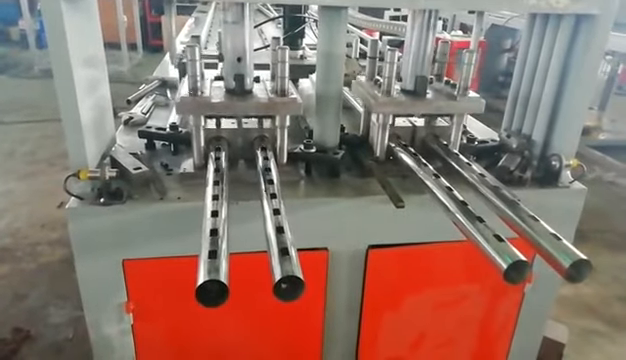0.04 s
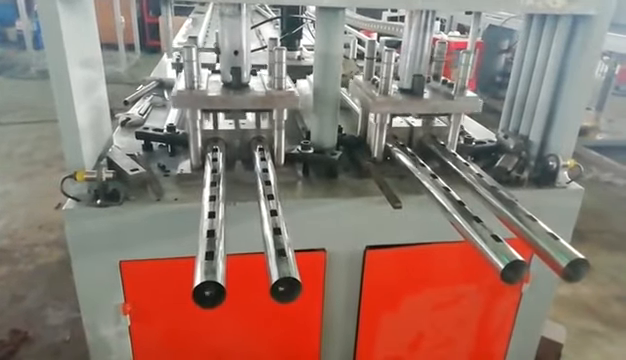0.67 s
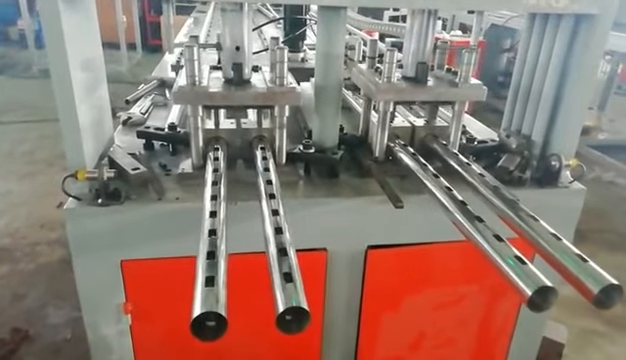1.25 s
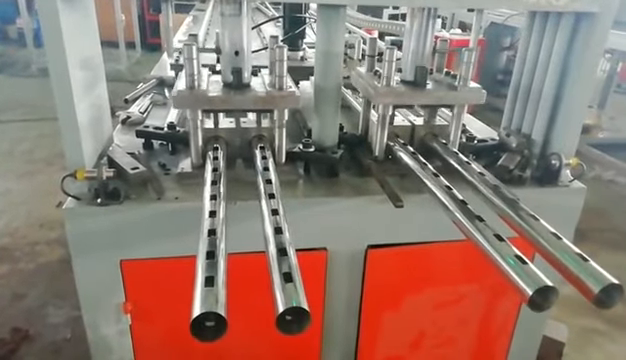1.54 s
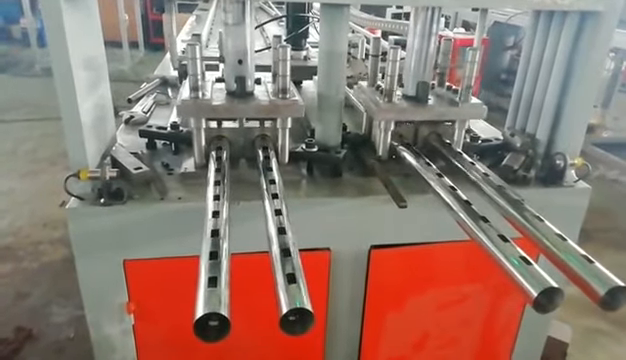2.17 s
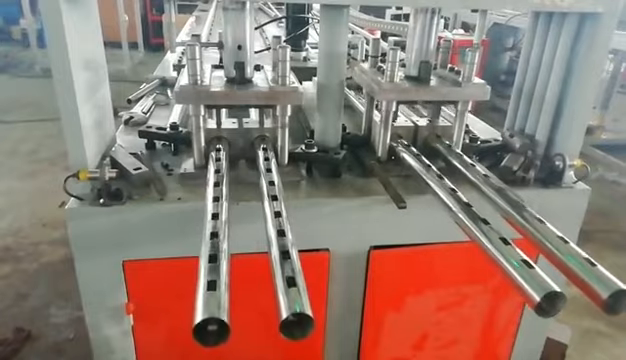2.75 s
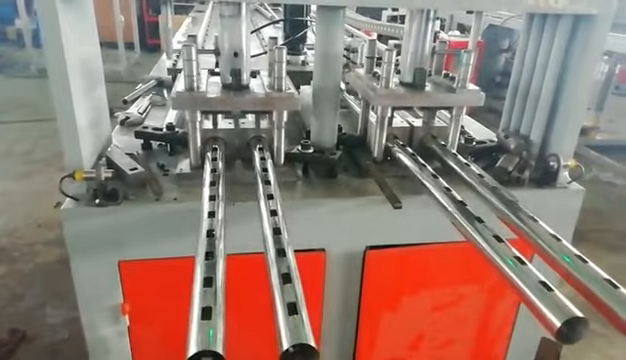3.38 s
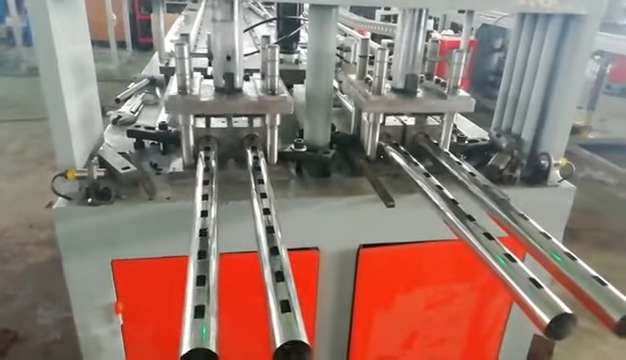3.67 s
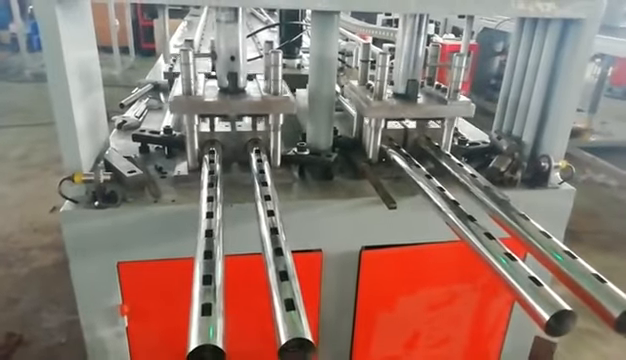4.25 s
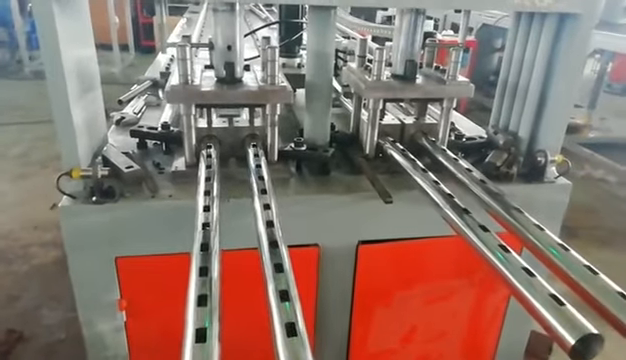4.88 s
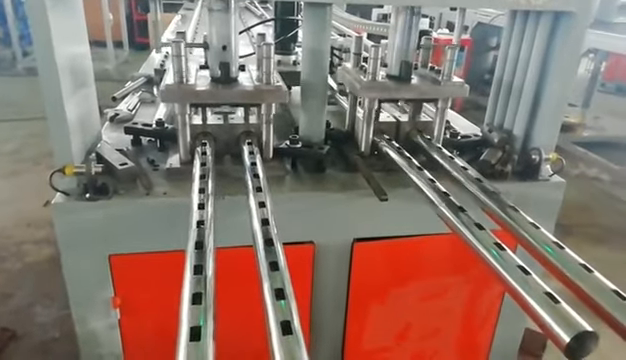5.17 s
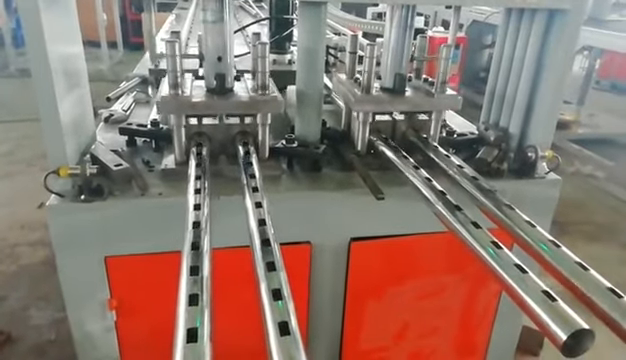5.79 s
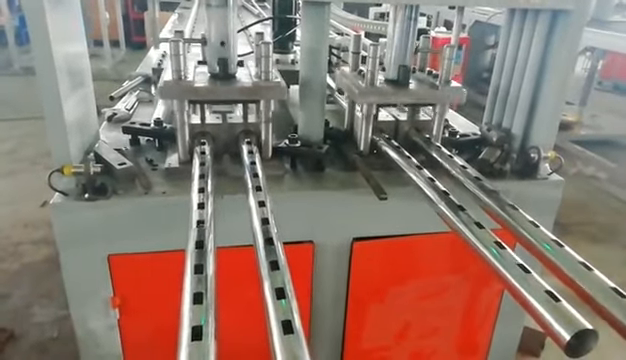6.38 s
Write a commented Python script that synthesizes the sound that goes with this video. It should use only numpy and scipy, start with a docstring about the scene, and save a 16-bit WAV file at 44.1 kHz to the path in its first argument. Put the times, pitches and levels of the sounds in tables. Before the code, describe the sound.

Four sharp metallic punch hits alternate with dull hydraulic knocks, humming and sliding, squealing tubes over steady workshop noise.

```python
"""A hydraulic punch snaps through steel tube about every two seconds; its die cracks, rebounds and rings.
Between hits friction makes the tubes slide, sing and squeal, and steel rattles faintly on the die.
On each stroke a valve knocks and the pump hums under load, over a bed of air hiss and workshop din.
Loud hits duck the whole mix through a gain control, and the shop noise swells back after them."""
import sys
import numpy as np
from scipy import signal
from scipy.fft import rfft, irfft
from scipy.io import wavfile
from scipy.ndimage import uniform_filter1d, minimum_filter1d

SR = 44100
rng = np.random.default_rng(int(sys.argv[2]) if len(sys.argv) > 2 else 0)


def wav_record(signal):
    """Record a signal, one row per channel, as 16-bit PCM in the file named by sys.argv[1]."""
    frames = np.transpose(np.atleast_2d(signal))
    bounded = np.clip(frames, -1, 1)
    # unit amplitude maps onto the largest positive 16-bit level
    quanta = np.round(bounded * 32767).astype(np.int16)
    wavfile.write(sys.argv[1], SR, quanta)


N = 292383
TIME = np.arange(N) / SR
FREQS = np.maximum(np.fft.rfftfreq(N, 1 / SR), 1)
RIGHT_LAG_S = 0.000607
CHANNEL_LAG_S = np.array([[0], [RIGHT_LAG_S]])

# Table levels are faders within a layer, ahead of its trim.
# the punch breaks through: t/s, snap/dB, length/s, wall ring/dB, squeak/dB
PUNCHES = [(0.014, -1, 0.0043, -5, -51), (1.809, 0, 0.0043, -21, 3), (3.638, 0.5, .006, -2, -38),
           (5.5564, 2.5, 0.0039, -4.5, -15)]
# the die lets go and rebounds: t/s, length/s, die/dB, plate/dB, die pitch ratio, crack/dB
DIE_BLOWS = [(0.032, 0.006, -2.5, -1.5, 1.04, -10), (0.047, 0.0071, -10.5, -10.5, 1.1, -19),
             (1.822, 0.013, -18, -14.5, 0.87, -30), (1.854, 0.0051, -4.5, -3, 0.97, -13),
             (1.869, 0.0013, -6.5, -1, 1.2, 1.5), (1.875, 0.0028, -7, -14, 1.0, -12),
             (3.663, 0.012, -15, -22.5, 1.1, -25), (3.686, 0.0045, -7.5, -1.5, .95, -6),
             (3.699, 0.01, -7, -4, .94, -19), (5.567, 0.006, -14.5, -10.5, .82, -19),
             (5.581, 0.0085, -7, -19, .8, -24), (5.606, 0.0061, -6.5, -3, 0.87, -5),
             (5.621, 0.004, -6, -6, .97, -11), (5.631, 0.0023, -5, -6, .93, -3.5)]
# the first punch's opening hit, then faint stray rattles: t/s, level/dB, length/s, plate send/dB
CLATTERS = [(.002, -2, 0.0029, 3.5), (1.279, -20.5, 0.011, -18), (2.383, -20, 0.025, -25),
            (4.055, -22, 0.016, -8), (4.649, -19, 0.014, -11), (5.071, -24, 0.0039, -11)]
# resonances of the steel impacts: f/Hz, width/Hz, level/dB
SNAP_MODES = [(5550, 140, -0.5), (6040, 410, 1.5), (6450, 150, -19), (4670, 310, -24)]
WALL_MODES = [(1134, 44, -0.5), (1340, 26, -6.5), (1550, 45, -4), (2220, 150, -2), (2600, 190, -1),
              (4700, 170, 0)]
DIE_MODES = [(1130, 67, -2), (1407, 40, 7), (1667, 110, 1), (1824, 100, 5), (2380, 130, 1), (2860, 650, -6),
             (3340, 120, -1.5), (3950, 150, -3.5), (5040, 310, 0)]
PLATE_MODES = [(5020, 230, -6.5), (5646, 200, 7.5), (5834, 120, 5), (5995, 200, 8.5), (6500, 250, -14.5)]
TAIL_MODES = [(6120, 47, -3.5), (5980, 73, -18), (3940, 170, -14), (2380, 340, -15)]

# dry steel squeals on steel: t/s, length/s, level/dB, fade/(dB/s), pitch ratio
SQUEALS = [(1.622, .062, -19, 170, 1.014), (1.72, .008, -25, 260, 1.017), (1.765, .03, -22.5, 260, 1.016),
           (2.018, .03, -24, 200, 1.018), (2.09, .025, -22, 150, 1.014), (2.648, .022, -16.5, 320, .991),
           (2.712, .03, -20.5, 110, .995), (2.812, .055, -20.5, 130, 1.004), (2.93, .03, -29, 42, .999)]
# hard rubs, and one long drag: start/s, end/s, level/dB
HARD_RUBS = [(1.535, 1.686, -20.5), (2.554, 2.852, -23)]
LONG_SCRAPE = (3.75, 4.4, -24)
# tubes sliding in their guides: t/s, level/dB
SLIDE_LEVEL = [(.07, -16), (.28, -19), (.37, -23), (.73, -18.5), (1.24, -27.5), (1.57, -22), (1.69, -24.5),
               (2.12, -23), (2.48, -38.5), (2.72, -58), (3.08, -36), (3.38, -17.5), (3.93, -21.5),
               (4.47, -19.5), (5.1, -45), (5.69, -29.5), (6.63, -34.5)]
# a rubbed tube sings, a tube grazes its guide, the feed whirrs: t/s, length/s, level/dB
SONGS = [(1.051, 0.051, -21.5), (3.918, 0.05, -22), (6.498, .16, -21)]
RASPS = [(0.215, .07, -26.5), (0.447, .04, -28), (4.63, .03, -27)]
FEEDS = [(1.66, 0.05, -25), (3.5, 0.12, -26.5), (5.356, 0.072, -28.5)]
# resonances driven by friction: f/Hz, width/Hz, level/dB
SQUEAL_MODES = [(3790, 20, 4.5), (3850, 43, 2.5), (4050, 45, 0.5), (4060, 35, -12.5)]
HARD_RUB_MODES = [(3965, 42, 9.5), (4250, 30, -6), (4280, 32, -1), (4375, 28, -0.5), (4435, 18, -6)]
SCRAPE_MODES = [(830, 12, -5), (1061, 6, -3), (1292, 7, 0), (1421, 8, -2), (1567, 6, -1), (1690, 7, -2),
                (2186, 8, 2), (2471, 7, -2), (2905, 7, 0), (3144, 6, 4), (3408, 6, -6), (3526, 6, -3),
                (4683, 14, -2), (5173, 7, 0), (5367, 7, 2)]
SLIDE_MODES = [(2630, 14, -5), (2760, 52, -2.5), (2910, 50, -7.5), (3135, 63, -5), (3362, 31, -7),
               (2483, 36, -5.5)]
SONG_MODES = [(2158, 33, -3.5), (2140, 110, -9.5)]
RASP_MODES = [(2800, 80, -4), (3026, 55, -6.5), (2630, 30, -7.5)]
FEED_MODES = [(891.8, 3.5, 8.5), (883, 36, 0.5), (780, 42, -3), (950, 120, -16)]

# the pump takes the load: t/s, length/s, tone/dB, frame rumble/dB, valve knock/dB
STROKES = [(0.384, 0.488, -23.5, -28.5, -13), (2.197, 0.507, -22.5, -27, -13),
           (4.035, 0.517, -23, -40, -11), (5.965, 0.49, -22, -30.5, -9.5)]
# stray knocks in the oil lines: t/s, level/dB
STRAY_KNOCKS = [(1.003, -13), (2.382, -16), (2.425, -24), (2.86, -22)]
# steady motor and pump partials: f/Hz, level/dB
MOTOR_LINES = [(105, -41.5), (315, -40), (630, -40.5), (899, -53.5), (1335, -47)]
# rides of the motor drone, the air hiss and the jet's whistle: t/s, level/dB
MOTOR_LEVEL = [(0, -60), (.4, -34), (.57, -51), (.9, -32), (1.17, -42), (1.7, -45), (2.1, -30.5),
               (2.35, -33.5), (2.5, -50), (3.3, -54), (3.6, -37), (4.15, -49), (4.75, -35), (5.08, -35.5),
               (5.55, -52), (6.2, -44), (6.42, -29), (6.63, -43)]
AIR_LEVEL = [(.07, -22.5), (.4, -24.5), (.73, -22), (.91, -28.5), (1.66, -27), (1.81, -25), (2.1, -29.5),
             (2.6, -29), (2.69, -32), (3.05, -31.5), (3.41, -20.5), (4.32, -19), (4.47, -23.5),
             (4.56, -28.5), (4.89, -36), (5.93, -29.5), (6.08, -24), (6.63, -31.5)]
WHISTLE_LEVEL = [(.07, -13), (.4, -29), (.73, -21.5), (.91, -30), (1.66, -41), (1.88, -15), (2.15, -32.5),
                 (2.48, -27), (2.7, -37), (3.05, -33.5), (3.4, -21), (3.73, -18.5), (3.82, -21),
                 (4.08, -24), (4.28, -21.5), (4.47, -22), (4.6, -33), (5.35, -41), (5.68, -15), (5.85, -34),
                 (6.08, -28.5), (6.63, -32.5)]
# resonances of the jet and of loose panels: f/Hz, width/Hz, level/dB
WHISTLE_MODES = [(5946, 72, 1.5), (6130, 34, 0.5), (5980, 40, -1.5), (6300, 34, -17)]
PANEL_MODES = [(710, 37, -5), (1066, 55, -1), (1310, 39, 3.5), (1553, 70, 1), (1750, 50, -2.5),
               (2740, 70, -8.5), (3040, 90, -5), (3800, 110, -9), (4880, 130, -5.5)]

# EQ curves of the noise layers: f/Hz, level/dB
CRACK_EQ = [(1100, -9), (1700, -4), (3000, -8), (4500, 0.5), (5700, 14), (6500, -0.5), (7400, -15)]
THUD_EQ = [(90, -12.5), (300, -0.5), (430, -6), (560, -32), (1200, -11), (3000, -28.5), (7000, -46.5)]
RUMBLE_EQ = [(20, -9), (36, -13), (55, -6), (72, -13), (100, -0.5), (150, -5), (200, -6.5), (260, -7),
             (360, -12), (500, -23), (900, -48)]
AIR_EQ = [(1850, -31), (2200, 0.5), (2450, -5.5), (2580, -23.5), (2850, -6.5), (3200, -14.5), (3600, -4.5),
          (4300, -5), (4750, -3.5), (5700, 2.5), (6200, -2), (6350, -2.5), (6800, -7), (6950, -5.5),
          (7500, -26.5)]
SHOP_EQ = [(250, -2), (350, -5), (560, -9), (640, -5), (900, -3), (1180, -4.5), (1350, -3.5), (1700, -8),
           (1850, -7), (2100, -5.5), (2580, -6.5), (2900, -10), (3600, -11), (4100, -14), (5000, -11.5),
           (6100, -11.5), (6700, -19.5), (7400, -47.5)]
# stereo likeness: f/Hz, share of noise power common to both channels
LIKENESS = [(60, 1), (100, 1), (220, 0.99), (400, 0.26), (1000, 0.053), (2000, 0.82), (7000, 0.31)]
# shading of the right channel: f/Hz, level/dB
RIGHT_SHADE = [(230, 0), (350, -1), (540, -4), (840, -9), (1300, -6.5), (2000, -10.5), (3100, -12),
               (4000, -13.5), (4800, -15.5), (5500, -29.5), (6200, -23.5), (6600, -20.5), (7000, -24.5),
               (7500, -36)]


def punch():
    """The tube wall snaps and rings; a binding punch squeaks."""
    snap, shear, binding = np.zeros((3, N))
    for start, snap_db, length, wall_db, squeak_db in PUNCHES:
        snap += from_db(snap_db) * burst(start, length, rise=0.001, t60=0.034)
        shear += from_db(wall_db) * burst(start, length, rise=0.001, t60=0.08)
        squeak_tail = from_db(-19) * burst(start, length, rise=0.002, t60=0.17)
        binding += from_db(squeak_db) * (burst(start, length, rise=0.002, t60=0.022) + squeak_tail)
    crack = snap * noise(resonances(SNAP_MODES))
    wall = struck(shear, WALL_MODES) * boost_right(2)
    squeak = binding * tone(5455, wander_hz=20, flutter_db=1)
    return crack + wall + squeak, snap   # the force also feeds the steel tail


def die_rebound():
    """The die lets go with a crack and rattles on its plate; gives the sound and the plate force."""
    clank = np.zeros((2, N))
    on_plate, transient = np.zeros((2, N))
    for start, length, die_db, plate_db, pitch, crack_db in DIE_BLOWS:
        force = burst(start, length, rise=0.001, t60=0.062)
        clank += struck(from_db(die_db) * force, retuned(DIE_MODES, pitch))
        on_plate += from_db(plate_db) * force
        transient += from_db(crack_db) * burst(start, length=0.001, rise=0.0003, t60=0.012)
    crack = transient * noise(eq(CRACK_EQ))
    return crack + clank * boost_right(2) + struck(on_plate, PLATE_MODES), on_plate


def steel_tail(force, t60=0.4):
    """The steel stores the energy of the blows and lets it go as a bright ring."""
    retained = from_db(-120 / (t60 * SR))
    energy = signal.lfilter([1 - retained], [1, -retained], force ** 2)
    return from_db(-7.5) * np.sqrt(energy + 1e-18) * noise(resonances(TAIL_MODES))


def steel_clatter():
    """Steel clatters on the die and plate: the first punch's loud opening hit, then faint rattles."""
    on_die, on_plate = np.zeros((2, N))
    for start, db, length, send_db in CLATTERS:
        force = from_db(db) * burst(start, length, rise=0.00091, t60=0.067)
        on_die += force
        on_plate += from_db(send_db) * force
    return from_db(-3.5) * struck(on_die, DIE_MODES) * boost_right(5.1) + struck(on_plate, PLATE_MODES)


def squeals(hz=3825, overshoot=0.018, settle_s=0.012):
    """Stick and slip lock on to a fluttering tone that starts sharp and stirs the modes beside it."""
    voices = np.zeros((2, N))
    for start, length, db, fade, pitch in SQUEALS:
        bend = 1 + overshoot * np.exp(-np.maximum(TIME - start, 0) / settle_s)
        locked = from_db(-2) * tone(hz * pitch * bend, wander_hz=8.96, flutter_db=4.5)
        grit = from_db(-3.5) * noise(resonances(retuned(SQUEAL_MODES, pitch)))
        envelope = from_db(db) * swell(start, length, rise_db_per_s=601, fall_db_per_s=fade)
        voices += envelope * (locked + grit)
    flutter = from_db(-0.5 + 2.3 * drift(40))
    return flutter * voices * boost_right(1.3)


def screech():
    """Hard rubs wake the squeal's upper modes."""
    pressure = sum(from_db(db) * burst(start, end - start, rise=0.033, t60=0.06)
                   for start, end, db in HARD_RUBS)
    return from_db(1) * pressure * noise(resonances(HARD_RUB_MODES)) * boost_right(4.9)


def long_scrape(lock_delay_s=0.15, lock_s=0.16):
    """A dragging tube stirs ever different wall modes, and midway locks on to two close ones."""
    start, end, db = LONG_SCRAPE
    upper = from_db(-4) * tone(2784, wander_hz=3.3, flutter_db=3)
    lower = tone(2746, wander_hz=1.16, flutter_db=1.5)
    lock = from_db(2.5) * swell(start + lock_delay_s, lock_s, rise_db_per_s=42, fall_db_per_s=45)
    drag = burst(start, end - start, rise=0.042, t60=0.43)
    return from_db(db) * (lock * (lower + upper) + drag * shifting(SCRAPE_MODES, sway_db=4, rate_hz=8))


def sliding_tubes():
    """Friction in the guides drives the tube modes: a metallic slide, brief singing and dry rasps."""
    slide = from_db(-3.5) * automation(SLIDE_LEVEL) * noise(resonances(SLIDE_MODES))
    song = swells(SONGS, rise_db_per_s=45, fall_db_per_s=22) * noise(resonances(SONG_MODES))
    grazing = swells(RASPS, rise_db_per_s=65, fall_db_per_s=98)
    rasp = grazing * from_db(2 * drift(35)) * noise(resonances(RASP_MODES))
    return slide + song + rasp


def feed(idle_db=-37):
    """The feed whirrs softly and swells just ahead of a punch."""
    feeding = swells(FEEDS, rise_db_per_s=86, fall_db_per_s=76.5)
    return (from_db(idle_db) + feeding) * noise(resonances(FEED_MODES))


def surges(bounce_s=0.056, bounce_db=-7.5, recoil_s=0.0113, recoil_db=-11.5):
    """Oil surges as t/s, level/dB: two as the valve opens, one after each punch, and the strays."""
    openings = [(start, db) for start, *_, db in STROKES]
    bounces = [(start + bounce_s, db + bounce_db) for start, db in openings]
    recoils = [(start + recoil_s, recoil_db) for start, *_ in PUNCHES]
    return openings + bounces + recoils + list(STRAY_KNOCKS)


def pipe_knocks(start_hz=410, end_hz=225, settle_s=0.04):
    """Each pressure surge thumps the pipes: a short falling note in a dull thud."""
    note, thud = np.zeros((2, N)), np.zeros(N)
    for start, db in surges():
        age = np.maximum(TIME - start - CHANNEL_LAG_S, 0)
        cycles = end_hz * age + (start_hz - end_hz) * settle_s * (1 - np.exp(-age / settle_s))
        envelope = from_db(db) * burst(start, length=0.0012, rise=0.0042, t60=0.44)
        note += envelope * np.sin(2 * np.pi * (cycles + rng.random()))
        thud += envelope
    return from_db(-7) * note + from_db(-8.5) * thud * noise(eq(THUD_EQ))


def pump(hz=222.4, idle_db=-38.5, prime_s=0.14, recharge_delay_s=0.24, recharge_s=0.22):
    """The pistons hum louder as they take up the slack, drive the stroke and top up the pressure."""
    load = from_db(idle_db + 4 * drift(5.8))
    for start, length, tone_db, *_ in STROKES:
        prime = (start - prime_s, prime_s, -34.5)
        drive = (start, length, tone_db)
        recharge = (start + length + recharge_delay_s, recharge_s, -31.5)
        for onset, hold, db in (prime, drive, recharge):
            load = np.maximum(load, from_db(db) * burst(onset, hold, rise=0.031, t60=0.19))
    fundamental = tone(hz, wander_hz=1.62, flutter_db=3.5)
    octave = from_db(-17) * tone(2 * hz, wander_hz=3, flutter_db=3)
    return load * (fundamental + octave)


def frame_rumble(idle_db=-35):
    """The strokes shake the frame, adding weight to its low idle rumble."""
    shake = from_db(idle_db + 1.8 * drift(3.2))
    for start, _, _, rumble_db, _ in STROKES:
        envelope = swell(start, length=0.14, rise_db_per_s=53.5, fall_db_per_s=11)
        shake = np.maximum(shake, from_db(rumble_db) * envelope)
    return shake * noise(eq(RUMBLE_EQ))


def motor(hz=70):
    """The motor's drone comes and goes under a steady set of partials."""
    drone = automation(MOTOR_LEVEL) * tone(hz, wander_hz=1.4, flutter_db=3.5)
    return drone + sum(from_db(db) * tone(f, wander_hz=1.28, flutter_db=5.5) for f, db in MOTOR_LINES)


def air_jet():
    """A jet of air hisses, with a rough whistle on top that flits between close pitches."""
    whistle = automation(WHISTLE_LEVEL) * shifting(WHISTLE_MODES, sway_db=2.5, rate_hz=20, count=2)
    hiss = from_db(1) * automation(AIR_LEVEL) * noise(eq(AIR_EQ))
    return hiss + whistle


def workshop():
    """A bed of machine din and rattling panels that lifts a little with each stroke."""
    working = sum(swell(start, 0.092, rise_db_per_s=48, fall_db_per_s=18.5) for start, *_ in STROKES)
    din = from_db(-23 + 1.56 * drift(17)) * noise(eq(SHOP_EQ) * reflections())
    panels = from_db(-31) * shifting(PANEL_MODES, sway_db=4.5, rate_hz=24)
    return (1 + from_db(-18.5) * working) * (din + panels)


def reflections(strength=0.32, count=16):
    """Early echoes off the casing and the floor ripple the spectrum."""
    echoes = np.zeros(N)
    delays = (rng.uniform(0.003, 0.045, count) * SR).astype(int)
    echoes[delays] = rng.choice([-1, 1], count) / np.sqrt(count)
    return np.abs(1 + strength * rfft(echoes))


def struck(force, modes, contacts_per_s=2600):
    """Irregular steel contacts, as hard as the force, set each mode ringing."""
    chance = contacts_per_s / SR
    slips = np.floor(np.cumsum(chance * rng.exponential(1, N)))
    contacts = (np.diff(slips, prepend=0) > 0) * rng.choice([-1, 1], N) / np.sqrt(chance)
    age = np.maximum(TIME[:SR // 8] - CHANNEL_LAG_S, 0)
    ring = np.zeros_like(age)
    for k, (hz, width, db) in enumerate(modes):
        stereo_phase = np.array([[0], [1.1 * rng.standard_normal()]])
        decay = from_db(db) * width * (age > 0) * np.exp(-np.pi * width * age)
        ring += (-1) ** k * decay * np.sin(2 * np.pi * hz * age + stereo_phase)
    ring /= np.sqrt(np.sum(ring[0] ** 2))
    return signal.fftconvolve((force * contacts)[None], ring, axes=1)[:, :N]


def noise(response):
    """Filtered stereo noise at unit rms: a shared part that reaches the left first, and a diffuse part."""
    shared, left, right = rfft(rng.standard_normal((3, N)))
    alike = np.clip(across_hz(LIKENESS), 0, 1)
    direct = np.sqrt(alike) * shared * np.exp(-2j * np.pi * FREQS * CHANNEL_LAG_S)
    diffuse = np.sqrt(1 - alike) * np.array([left, right])
    return rms_one(irfft((direct + diffuse) * response, N))


def shifting(modes, sway_db, rate_hz, count=3):
    """A moving texture: groups of modes come and go on their own."""
    groups = [resonances(modes[k::count]) for k in range(count)]
    return rms_one(sum(np.linalg.norm(group) * from_db(sway_db * drift(rate_hz)) * noise(group)
                       for group in groups))


def tone(hz, wander_hz, flutter_db):
    """An unsteady sine that reaches the left first."""
    phase = 2 * np.pi * np.cumsum(hz + wander_hz * drift(4.97)) / SR
    lag = 2 * np.pi * hz * CHANNEL_LAG_S
    return np.sqrt(2) * np.sin(phase - lag) * from_db(flutter_db * drift(15))


def burst(start, length, rise, t60):
    """Contact envelope: linear attack, hold, exponential release; times in seconds."""
    envelope = np.zeros(N)
    sounding = (TIME > start) & (TIME < start + length + 2 * t60)
    age = TIME[sounding] - start
    envelope[sounding] = np.minimum(age / rise, 1) * from_db(-60 * np.maximum(age - length, 0) / t60)
    return envelope


def swell(start, length, rise_db_per_s, fall_db_per_s):
    """An envelope that fades in up to its start, holds and fades out."""
    before, after = np.maximum(start - TIME, 0), np.maximum(TIME - start - length, 0)
    return from_db(-rise_db_per_s * before - fall_db_per_s * after)


def swells(cues, rise_db_per_s, fall_db_per_s):
    """One swell per row of t/s, length/s, level/dB, summed."""
    return sum(from_db(db) * swell(t, length, rise_db_per_s, fall_db_per_s) for t, length, db in cues)


def drift(rate_hz, step=32):
    """Smooth random modulation at unit rms."""
    count = N // step + 2
    hz = np.fft.rfftfreq(count, step / SR)
    slow = irfft(rfft(rng.standard_normal(count)) / (1 + (hz / rate_hz) ** 2), count)
    return np.interp(TIME, np.linspace(0, N / SR, count), rms_one(slow))


def automation(rows):
    """A fader ride from rows of t/s, level/dB."""
    return from_db(np.interp(TIME, *np.transpose(rows)))


def resonances(modes):
    """Gain per frequency of a body with steep-sided resonances."""
    return sum(from_db(db) / (1 + ((FREQS - hz) / width) ** 2) for hz, width, db in modes)


def retuned(modes, ratio):
    """The same modes at another pitch."""
    return [(hz * ratio, width, db) for hz, width, db in modes]


def eq(points):
    """Gain per frequency of an EQ curve, rolling off below its first point."""
    return from_db(across_hz(points)) * np.minimum(FREQS / points[0][0], 1) ** 2


def across_hz(points):
    """A table read on a log-frequency axis."""
    hz, value = np.transpose(points)
    return np.interp(np.log(FREQS), np.log(hz), value)


def boost_right(db):
    """Channel gains that lean a source to the right."""
    return np.array([[1], [from_db(db)]])


def from_db(db):
    """Decibels to gain."""
    return 10 ** (np.asarray(db) / 20)


def rms_one(x):
    """Scale to unit rms."""
    return x / np.sqrt(np.mean(x ** 2) + 1e-20)


def scene():
    """Hits, friction, hydraulics and bed, with the treble shaded on the right."""
    snaps, snap_force = punch()
    rebounds, plate_force = die_rebound()
    hits = snaps + rebounds + steel_tail(snap_force + plate_force) + steel_clatter()
    friction = squeals() + screech() + long_scrape() + sliding_tubes() + feed()
    hydraulics = pipe_knocks() + pump() + frame_rumble() + motor()
    left, right = hits + friction + hydraulics + air_jet() + workshop()
    return np.array([left, irfft(rfft(right) * from_db(across_hz(RIGHT_SHADE)), N)])


def gain_control(x, threshold_db=-4.5, release_db_per_s=38, hold_s=0.1):
    """Loud moments duck both channels at once; the gain holds, then creeps back."""
    power = uniform_filter1d(np.max(x ** 2, axis=0), size=220)
    over_db = np.maximum(10 * np.log10(np.maximum(power, 1e-12)) - threshold_db, 0)
    hold = int(hold_s * SR)
    held_db = -minimum_filter1d(-over_db, hold, origin=(hold - 1) // 2)
    release_db = release_db_per_s * TIME
    cut_db = np.maximum.accumulate(held_db + release_db) - release_db
    return x * from_db(-uniform_filter1d(cut_db, size=130))


def record(dry):
    """Master chain: gain control, soft clipping and a steep high cut."""
    rounded = 1.211 * np.tanh(gain_control(dry) / 1.305)
    high_cut = signal.ellip(10, 0.1, 80, 7600, fs=SR, output="sos")
    return signal.sosfilt(high_cut, rounded)


dry = scene()
out = record(dry)
wav_record(out)
```